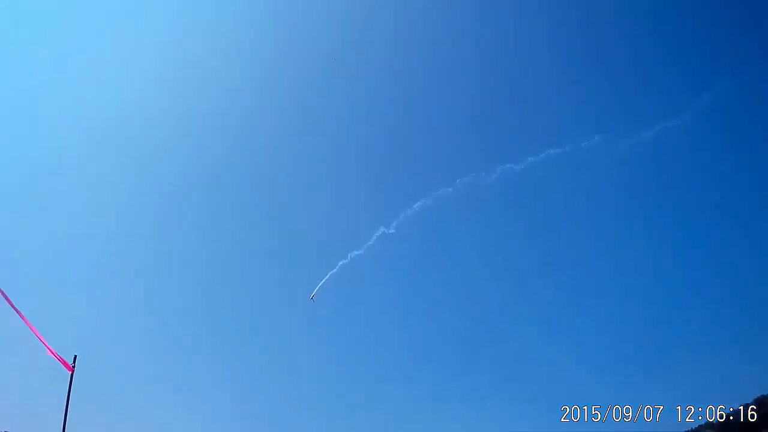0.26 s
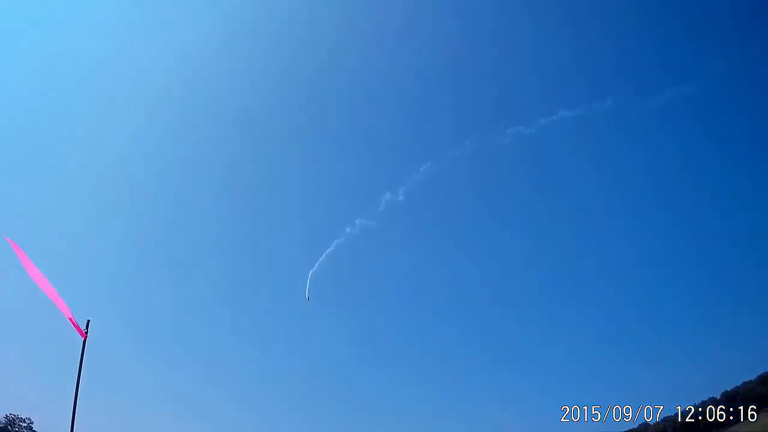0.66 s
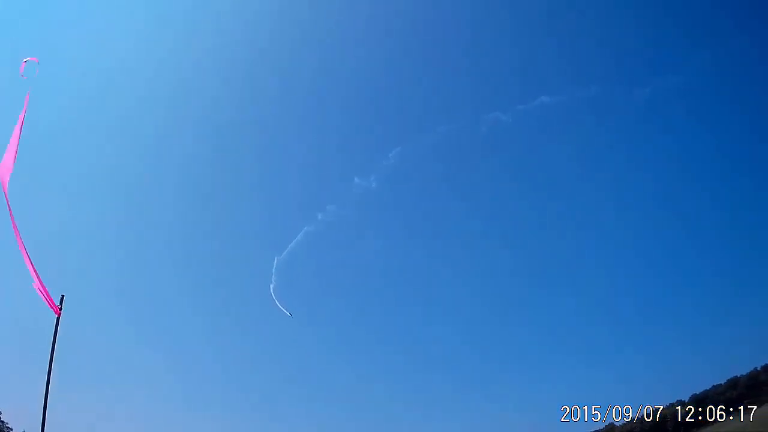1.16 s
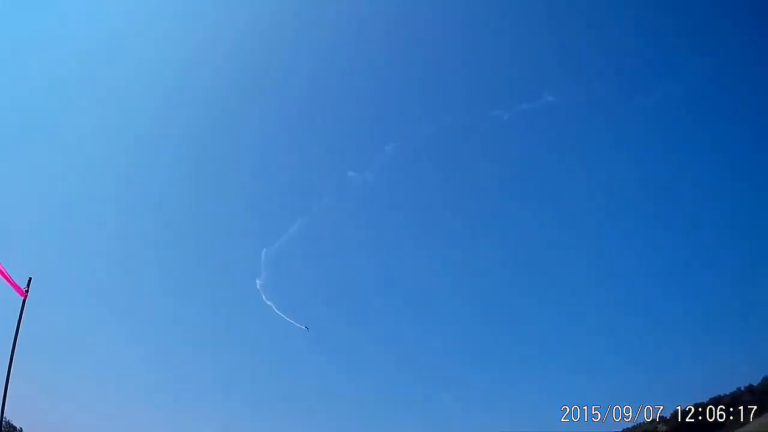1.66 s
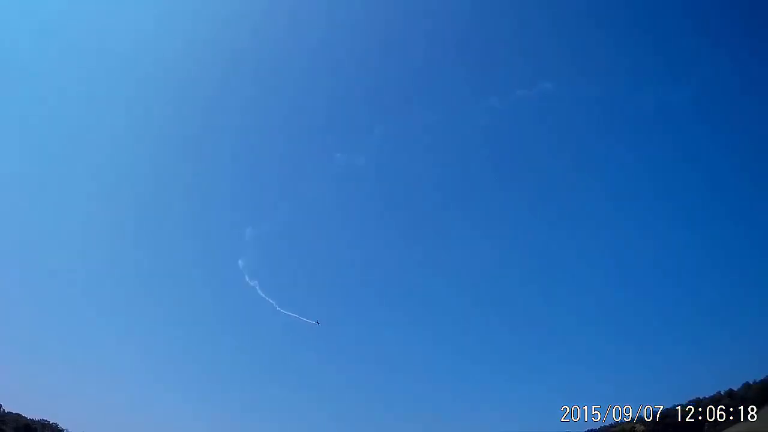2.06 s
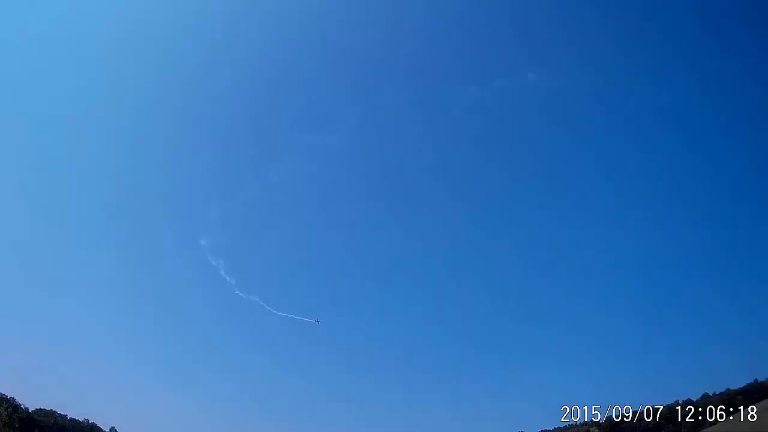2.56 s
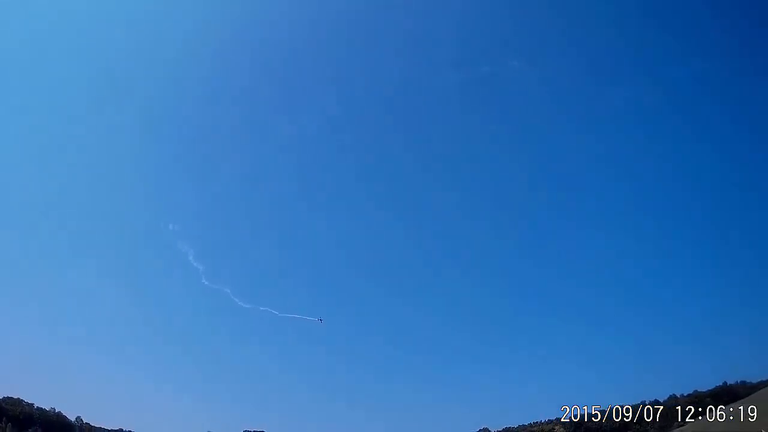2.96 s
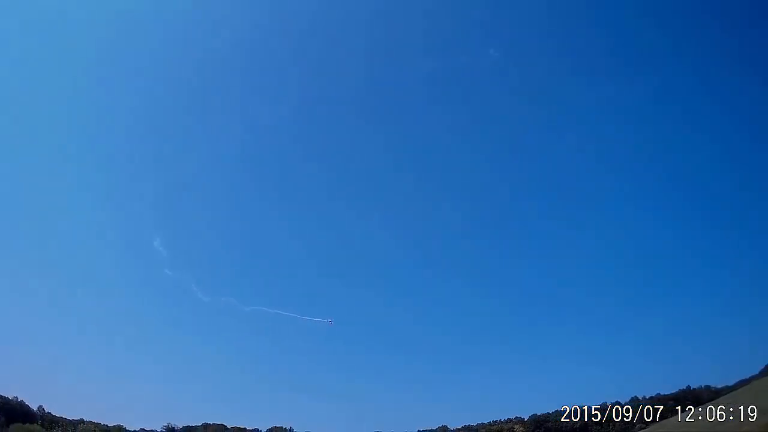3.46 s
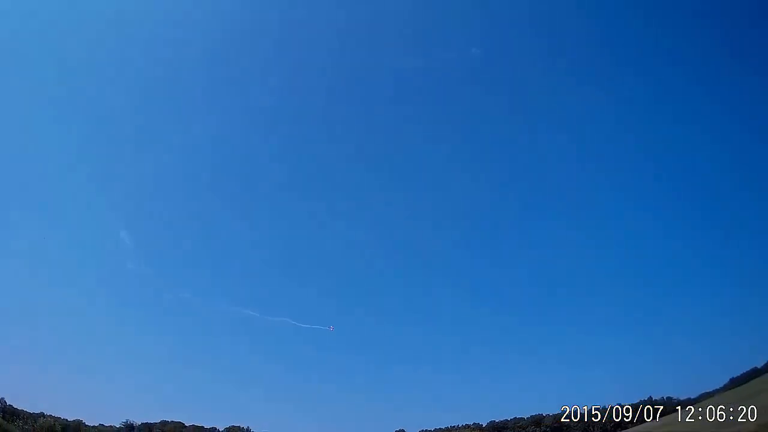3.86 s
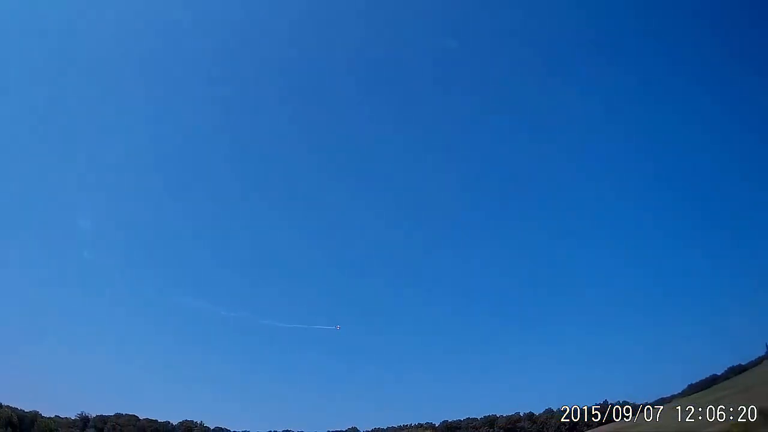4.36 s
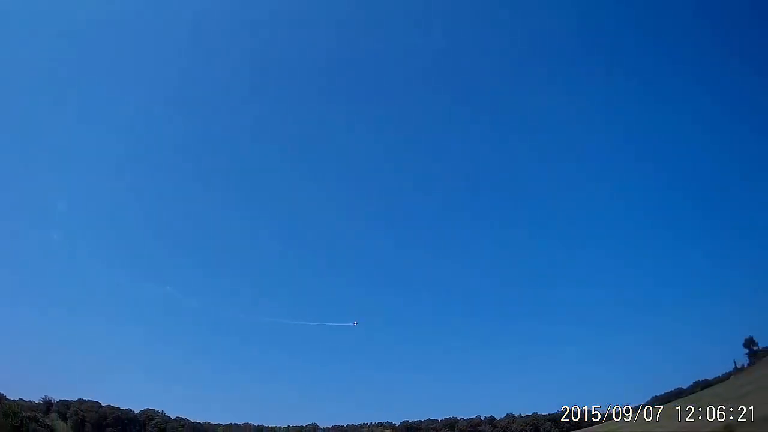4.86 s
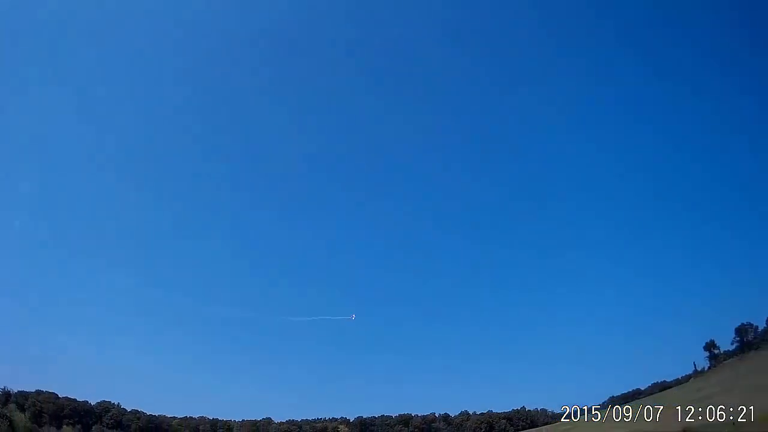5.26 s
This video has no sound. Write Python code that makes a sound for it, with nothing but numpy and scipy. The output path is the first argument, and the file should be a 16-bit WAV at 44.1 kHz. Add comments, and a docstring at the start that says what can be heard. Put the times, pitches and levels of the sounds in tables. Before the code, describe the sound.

A small model plane engine buzzes nasally overhead, loudest in the first half second, then falls away in uneven pulses as its pitch sags and later recovers. Low-frequency wind noise dominates, with soft overloaded thuds and fluttering bursts against the cheap microphone, thickest in the first two seconds. There is thin background hiss, a faint click roughly every second, and two barely audible high chirps from the field just before two seconds.

```python
"""A model aeroplane turns overhead and flies off over a field, heard on a small camera's microphone in gusty wind.
It opens close and side-on: firings crack and ring the silencer, and a three-bladed propeller drones and washes.
The engine sags in the turn, shows its rear quarter and then its tail; it swells and fades, coloured by a ground echo.
Throughout, wind rumbles, flutters and slaps the microphone over unsteady hiss and ticks on a one-second beat.
Two faint chirps come from the field shortly before two seconds; one late tick is missing."""
import sys
import numpy as np
from scipy import signal
from scipy.fft import rfft, irfft
from scipy.io import wavfile
from scipy.ndimage import uniform_filter1d

SR = 44100
rng = np.random.default_rng(int(sys.argv[2]) if len(sys.argv) > 2 else 0)


def master_out(mix):
    """Clip the mix to full scale and print it as 16-bit PCM to the path in sys.argv[1]."""
    frames = np.transpose(np.atleast_2d(mix))
    ceiling = np.clip(frames, -1, 1)
    pcm = np.round(ceiling * 32767).astype(np.int16)
    wavfile.write(sys.argv[1], SR, pcm)


N = 243431
TIME = np.arange(N) / SR  # seconds

# Engine speed as heard, sagging in the turn and picking up on the straight: time_s, firing_rate_hz
ENGINE_SPEED = [(0, 110.4), (.05, 110.3), (.2, 109), (.42, 108.6), (.6, 106.6), (1.1, 103.7), (1.22, 104),
                (1.36, 103.6), (1.78, 103.85), (1.92, 104.7), (2.35, 105.85), (2.52, 106), (2.9, 105.35),
                (3.1, 105.1), (3.18, 105.6), (3.3, 105.05), (3.5, 106.3), (3.7, 105.85), (3.9, 105.9),
                (4.03, 107.55), (4.28, 107.7), (4.55, 110.05), (4.63, 111.5), (4.8, 110.6), (4.94, 108.9),
                (5.04, 109.55), (5.12, 110.7), (5.32, 111.35), (5.52, 110.9)]
# Engine falling back until about four seconds, its buzz then rising again:
# time_s, buzz_level_db, wash_level_db, buzz_tilt_db_per_octave
ENGINE_LEVELS = [(0, -41.5, -48.5, -1), (.48, -42.5, -46.5, -5), (.7, -48.5, -52.5, -2.5),
                 (1.05, -51, -53.5, -3), (1.3, -54.5, -55, -7.5), (2.1, -53, -51.5, -1),
                 (3.1, -58.5, -57.5, -4), (3.9, -59, -57.5, -7), (4.4, -57, -58, -5), (4.95, -57, -61, -6),
                 (5.52, -52.5, -57.5, 0.5)]
# Two low tones fading in and out: time_s, propeller_level_db, exhaust_tone_level_db
DRONE_LEVELS = [(0, -30.5, -47), (.45, -29, -39.5), (.75, -45.5, -49.5), (1.6, -39.5, -49.5),
                (2.25, -33, -66), (2.8, -32, -57.5), (3.3, -26.5, -49), (3.72, -33, -63),
                (4.15, -27.5, -45), (4.7, -37.5, -55), (5.3, -32, -48.5), (5.52, -38, -54.5)]
# Side of the aeroplane facing the microphone: time_s, view (0 side, 1 rear quarter, 2 tail)
VIEW = [(0, 0), (1.05, 0), (1.25, 1), (3.95, 1), (4.5, 2), (5.52, 2)]
# The engine swells and fades, one band most, and the level dips briefly at 4.7 s: peak_s, length_s, band_hz,
# buzz_lift_db, rasp_lift_db
ENGINE_SWELLS = [(.005, 0.21, 1300, 8.5, 4.5), (0.068, 0.067, 2100, -6.5, -10),
                 (0.16, 0.045, 2000, -0.5, 10), (0.195, 0.12, 1410, 8, -3), (0.247, 0.1, 2100, -4, 0),
                 (0.322, 0.14, 1530, 8, 10), (0.48, 0.23, 1200, 5, -2), (0.586, 0.055, 1290, 3.5, 4),
                 (0.802, 0.058, 1300, -2.5, -2), (0.877, 0.2, 2080, 12, 2), (0.912, .09, 1000, 5.5, 7),
                 (1.07, 0.068, 2240, 5.5, 2.5), (1.18, 0.078, 2200, -1.5, -11),
                 (1.604, 0.22, 1830, 10, 1.5), (2.053, 0.17, 1770, 3.5, 6), (2.185, 0.12, 1300, -5.5, -8),
                 (2.317, 0.088, 1960, 7.5, -1), (2.44, 0.11, 2050, -5, -9), (2.497, 0.44, 950, 11, 0),
                 (2.61, 0.098, 2000, 7, 0), (2.72, 0.061, 1500, -3, -2), (3.44, 0.16, 2060, 10.5, 7),
                 (3.84, 0.15, 1670, 15, 6), (4.213, 0.26, 1470, 13.5, 3), (4.385, .06, 2000, -2, 0),
                 (4.51, 0.23, 1520, 13, 0), (4.7, 0.27, 1930, -17.5, -19), (4.81, 0.12, 1570, 14, -5),
                 (4.936, 0.059, 1540, -4, -7), (5.075, 0.072, 2000, -5, -16), (5.182, 0.22, 1410, 10, -3),
                 (5.204, .09, 2050, 5, 9)]
# The rasp turning bright and dull: time_s, tilt_db_per_octave
RASP_BRIGHTNESS = [(0, -4), (.17, 2), (.27, 2), (.34, -2), (.62, -4), (.75, 5), (.88, -18), (1.1, -10),
                   (2, -9), (4.9, -9), (5.2, 1), (5.52, -4)]
# Ground echo, weaker during some swells: time_s, echo_gain (0-1, before each sound's own share)
ECHO_GAIN = [(0, 1), (.35, 0.87), (.7, 1), (.9, 0.7), (1.1, 1), (3.95, 1), (4.2, 0.5), (4.45, 1), (5.52, 1)]

# Engine spectra, only their shape counts: frequency_hz, relative_density_db
SIDE_SPECTRUM = [(450, -16), (650, 9.5), (760, -2), (870, 6.5), (1080, 11), (1200, 14), (1310, 13),
                 (1420, 14), (1530, 17.5), (1640, 14.5), (1750, -1.5), (1880, 16), (2100, 14.5), (2300, 8),
                 (2450, 2.5), (2650, -19), (3400, -45)]
QUARTER_SPECTRUM = [(450, -17), (640, 9), (740, -4), (840, 7), (945, 9), (1050, 13), (1155, 7), (1260, 12),
                    (1365, 17), (1470, 16), (1575, 0.5), (1680, 17.5), (1785, 16.5), (1890, 14.5),
                    (2110, 15.5), (2210, 12.5), (2320, 3), (2620, -19), (3400, -34)]
TAIL_SPECTRUM = [(450, -11.5), (640, 10), (760, -10), (860, -6), (1000, 9.5), (1100, 8), (1215, 14.5),
                 (1320, 13.5), (1420, 3.5), (1545, 18), (1660, 8), (1880, 10.5), (2100, 16), (2320, 1),
                 (2600, -19), (3400, -52)]
RASP_SPECTRUM = [(1200, -25), (2200, -10), (2700, -19), (3050, -4), (3380, -1.5), (3480, 2.5), (3600, -1.5),
                 (3900, -5), (4350, -2), (4750, -10), (5200, -18), (8000, -28), (12000, -45)]
WASH_SPECTRUM = [(400, -13), (750, -7), (1100, -3), (1500, 5), (1900, -0.5), (2200, -17), (2600, -16.5),
                 (3500, -17), (6000, -45)]

# Strength of the wind before gusts and buffets: time_s, rumble_level_db, flutter_level_db
WIND_LEVELS = [(0, -23, -24.5), (.35, -20.5, -28), (.52, -18, -27), (1.1, -19.5, -25), (1.55, -22, -28.5),
               (2.08, -17.5, -25.5), (2.25, -25, -35), (2.85, -24, -31.5), (3.2, -18.5, -26.5),
               (3.5, -25, -32.5), (3.77, -23, -34.5), (3.92, -19, -31), (4.7, -21, -32), (4.8, -23, -37),
               (5.38, -25, -42), (5.52, -38, -48)]
# Gusts that stand out: peak_s, length_s, rumble_lift_db, flutter_lift_db
WIND_GUSTS = [(0.003, 0.055, 5, 2.5), (0.135, 0.1, 8, 4), (0.453, 0.093, 3, 10.5), (0.58, 0.077, 3, 9.5),
              (0.691, 0.037, 7, 2), (0.762, 0.03, -12, 10.5), (0.834, 0.03, -8.5, -2),
              (0.946, 0.14, 4, 5.5), (1.138, 0.099, -0.5, 4.5), (1.21, 0.034, 2, 2), (1.317, 0.11, 4, 5),
              (1.484, 0.061, 5, 6.5), (1.672, 0.084, 4.5, 8.5), (1.777, 0.037, -1, -11),
              (1.927, 0.033, -13, 3), (2.094, 0.042, -7, 5.5), (2.273, 0.13, 1.5, 5),
              (2.445, 0.023, -1, 12.5), (2.563, 0.12, 5.5, 4.5), (2.88, 0.066, -3, -10),
              (2.957, 0.023, 1, 6), (3.205, 0.066, 0, 1), (3.377, 0.045, 5, -3.5), (3.625, 0.069, 9.5, 8),
              (3.766, 0.065, -3, -1), (3.91, 0.028, 3.5, 1.5), (4.05, 0.08, 3.5, 3), (4.163, 0.02, -13, -8),
              (4.225, 0.089, 2, 3.5), (4.295, 0.078, 2.5, 6), (4.395, .04, 1, -4), (4.52, 0.1, 4.5, 6.5),
              (4.573, 0.017, 9.5, -4), (4.634, 0.07, 7.5, 11), (4.673, 0.033, 7, -5), (4.96, 0.05, 2, -16),
              (5.029, 0.039, -10, -11), (5.148, 0.03, 6, 9.5)]
# Single eddies slapping the microphone, before its port and overload: centre_s, peak_db, pitch_hz
MIC_SLAPS = [(.122, -11, 150), (.181, -10, 135), (.471, -8.5, 215), (.572, -10, 140), (.597, -9, 215),
             (.621, -10, 135), (.684, -6, 170), (.738, -9, 160), (.765, -11, 150), (.959, -8, 145),
             (.981, -6.5, 210), (1.044, -7.5, 170), (1.102, -8.5, 175), (1.143, -3.5, 145),
             (1.48, -8.5, 195), (1.654, -9.5, 225), (1.686, -9, 170), (2.071, -11, 145), (3.148, -10, 185),
             (3.217, -5.5, 230), (3.647, -2.5, 240), (3.862, -10, 205), (4.058, -11, 160),
             (4.125, -10.5, 200), (4.211, -9.5, 185), (4.318, -11, 195), (4.443, -8, 155), (4.515, -7, 195),
             (4.701, -8.5, 185), (4.735, -12, 200)]
# Wind spectra for large and small eddies, only their shape counts: frequency_hz, relative_density_db
RUMBLE_SPECTRUM = [(10, -47), (22, -7), (45, 2.5), (80, 3.5), (125, 1), (180, -5.5), (240, -13),
                   (320, -26.5), (500, -36.5), (900, -61)]
FLUTTER_SPECTRUM = [(60, -28.5), (150, 1.5), (230, -1), (300, -4.5), (380, -10.5), (470, -19), (580, -29.5),
                    (750, -47.5), (1200, -44)]

# Faint whistles from the field: start_s, length_s, pitch_hz, peak_db
FIELD_CHIRPS = [(1.785, .09, 8330, -62), (1.935, .035, 8400, -72)]
# Camera hiss, only its shape counts: frequency_hz, relative_density_db
HISS_SPECTRUM = [(300, 9), (2000, 4), (3000, -4.5), (4400, -3.5), (5200, -6.5), (7500, -8.5), (8300, -7),
                 (9000, -9), (12600, -10.5), (14000, -13), (15300, -36)]
# Camera hiss before its small random waver: time_s, level_db
HISS_LEVELS = [(0, -51.5), (.23, -55), (.4, -48.5), (.72, -54), (.92, -53.5), (1.18, -57.5), (1.55, -51.5),
               (2.07, -50), (2.5, -53.5), (3.17, -49.5), (3.82, -51), (4.3, -54), (4.51, -50.5),
               (4.71, -55.5), (4.97, -51), (5.1, -56.5), (5.32, -50.5), (5.52, -55)]
# Electrical ticks before the camera's top cut: start_s, peak_db
CAMERA_TICKS = [(0.2866, -23), (1.2866, -21), (2.2878, -36), (3.287, -25.5), (5.2868, -25.5)]

# Rasp level at the usual buzz level, and its dB per dB of buzz
RASP_DB, RASP_FOLLOW, USUAL_BUZZ_DB = -62.5, 0.97, -49.5
BUZZ_ECHO, RASP_ECHO = 0.6, 0.35  # echo share of each; grass scatters the treble
FOCUS_WIDTH_HZ, SWELL_SPREAD = 290, 0.43  # width of a swell's band; share of the lift the other bands get
WASH_SHARE = 0.2  # share of an upward lift that the wash gets
# Echo delay high up and at the horizon; the aeroplane sinks fast at first
HIGH_LAG_S, LOW_LAG_S, DESCENT_S, DESCENT_EASE = 0.00574, 0.00313, 5.9, 2.7
# Small random buffets: changes per second, then the signed spread for each layer
BUFFET_RATE, RUMBLE_BUFFET_DB, FLUTTER_BUFFET_DB = 28, 1, -1
MIC_DRIVE = 0.79  # how hard the wind pushes the microphone into overload
TOP_HZ = 15600  # the camera's upper limit


def aeroplane():
    """Exhaust pulses and propeller tone locked to one shaft, over the propeller's wash."""
    firing_hz, = curves(ENGINE_SPEED)
    buzz_db, wash_db, tilt_db = curves(ENGINE_LEVELS)
    swells, rasp_lift_db = [], 0
    for peak_s, length_s, band_hz, buzz_lift_db, lift_db in ENGINE_SWELLS:
        shape = hump(peak_s, length_s)
        swells.append((band_hz, buzz_lift_db * shape))
        rasp_lift_db = rasp_lift_db + lift_db * shape
    rasp_db = RASP_DB + RASP_FOLLOW * (buzz_db - USUAL_BUZZ_DB) + rasp_lift_db

    turns = np.cumsum(firing_hz * (1 + 0.0005 * walk(25))) / SR  # one firing a turn
    pulses = firings(turns, scatter_db=0.45, jitter_s=0.000005)
    exhaust = over_ground(buzz(pulses, tilt_db, swells) * undb(buzz_db), BUZZ_ECHO)
    exhaust += over_ground(rasp(turns) * undb(rasp_db), RASP_ECHO)
    return exhaust + drone(turns) + wash(wash_db, swells)


def firings(turns, scatter_db, jitter_s):
    """One pressure pulse a shaft turn, each a little different in size and moment."""
    at = np.interp(np.arange(int(turns[-1]) + 1), turns, np.arange(N))
    timing, strength = rng.standard_normal((2, len(at)))
    at = np.clip(at + jitter_s * SR * timing, 0, N - 2)
    first, size = at.astype(int), undb(scatter_db * strength)
    # share each pulse between two samples to keep its exact moment
    late = at % 1
    return np.bincount(first, size * (1 - late), N) + np.bincount(first + 1, size * late, N)


def buzz(pulses, tilt_db, swells):
    """Firings ring the silencer; its colour changes as the tail swings round, and swells favour their bands."""
    def shape_db(hz):
        """Spectral tilt plus the lift of every swell at this frequency."""
        level_db = tilt_db * np.log2(hz / 1500)
        for band_hz, lift_db in swells:
            focus = np.exp(-((hz - band_hz) / FOCUS_WIDTH_HZ) ** 2)
            level_db = level_db + lift_db * (SWELL_SPREAD + (1 - SWELL_SPREAD) * focus)
        return level_db

    view, = curves(VIEW)
    ring = np.zeros(N)
    for k, spectrum in enumerate((SIDE_SPECTRUM, QUARTER_SPECTRUM, TAIL_SPECTRUM)):
        ring += np.maximum(1 - np.abs(view - k), 0) * colour(pulses, spectrum)
    return fade(ring, np.linspace(850, 2250, 8), shape_db, waver_db=1.2, rate=9)


def rasp(turns):
    """Each firing cracks unevenly and gas hisses out behind it; the treble turns bright and dull."""
    pulses = firings(turns, scatter_db=2.2, jitter_s=0.00002)
    gas = unit(np.exp(-(turns % 1) / 0.12) * rng.standard_normal(N))
    crack = colour(unit(pulses) + 0.12 * gas, RASP_SPECTRUM)
    tilt_db, = curves(RASP_BRIGHTNESS)

    def shape_db(hz):
        """Treble tilt about 3700 Hz."""
        return tilt_db * np.log2(hz / 3700)

    return fade(crack, [2900, 3400, 3900, 4400, 6000], shape_db, waver_db=2.4, rate=24)


def drone(turns):
    """Three blades sound the third shaft order; the exhaust adds a low tone on the fifth."""
    blade_db, pipe_db = curves(DRONE_LEVELS)
    blades = np.sin(2 * np.pi * 3 * turns) * undb(blade_db + 1.5 * walk(16))
    pipe = np.sin(2 * np.pi * 5 * turns) * undb(pipe_db)
    return blades + pipe


def wash(wash_db, swells):
    """Propeller turbulence as coloured noise, taking a little of each net swell and all of each net fade."""
    lift_db = sum(db for _, db in swells)
    return noise(WASH_SPECTRUM) * undb(wash_db + np.minimum(WASH_SHARE * lift_db, lift_db))


def over_ground(x, share):
    """Direct sound plus its echo off the field: a comb that slides through the harmonics."""
    height = np.maximum(1 - TIME / DESCENT_S, 0) ** DESCENT_EASE
    lag_s = LOW_LAG_S + (HIGH_LAG_S - LOW_LAG_S) * height
    gain = share * curves(ECHO_GAIN)[0]
    echo = np.interp(TIME - lag_s, TIME, x)
    return (x + gain * echo) / np.sqrt(1 + gain ** 2)


def fade(x, centres_hz, shape_db, waver_db, rate):
    """Neighbouring bands follow shape_db(hz) and also wax and wane on their own."""
    spectrum, grid_hz = rfft(x), np.fft.rfftfreq(N, 1 / SR)
    out = np.zeros(N)
    for hz, weights in zip(centres_hz, np.eye(len(centres_hz))):
        band = irfft(spectrum * np.interp(grid_hz, centres_hz, weights), N)
        out += band * undb(shape_db(hz) + waver_db * walk(rate))
    return out


def wind():
    """Large eddies rumble, small ones flutter in bursts, gusts shift both, and a few eddies slap the microphone."""
    rumble_db, flutter_db = curves(WIND_LEVELS)
    buffet = walk(BUFFET_RATE)
    rumble_db = rumble_db + RUMBLE_BUFFET_DB * buffet
    flutter_db = flutter_db + FLUTTER_BUFFET_DB * buffet
    for peak_s, length_s, rumble_lift_db, flutter_lift_db in WIND_GUSTS:
        gust = hump(peak_s, length_s)
        rumble_db = rumble_db + rumble_lift_db * gust
        flutter_db = flutter_db + flutter_lift_db * gust
    out = evened(noise(RUMBLE_SPECTRUM)) * undb(rumble_db)
    out += evened(noise(FLUTTER_SPECTRUM)) * undb(flutter_db + 2.6 * walk(55))
    out += slaps()
    # eddies smaller than the microphone port average out
    return signal.sosfiltfilt(signal.butter(2, 1000, fs=SR, output="sos"), out)


def slaps():
    """Passing vortices: each a suction dip between two pressure humps."""
    out = np.zeros(N)
    for centre_s, peak_db, hz in MIC_SLAPS:
        reach = (np.pi * hz * (TIME - centre_s)) ** 2
        out -= undb(peak_db) * (1 - 2 * reach) * np.exp(-reach)
    return out


def chirps():
    """Thin, slightly unsteady sine whistles from the field."""
    out, waver = np.zeros(N), 1 + 0.0037 * walk(70)
    for start_s, length_s, hz, peak_db in FIELD_CHIRPS:
        progress = np.clip((TIME - start_s) / length_s, 0, 1)
        swell = np.sqrt(np.abs(np.sin(np.pi * progress)))
        out += undb(peak_db) * swell * np.sin(2 * np.pi * np.cumsum(hz * waver) / SR)
    return out


def camera():
    """Coloured-noise hiss that swells and dips, and one-sample electrical ticks."""
    hiss_db, = curves(HISS_LEVELS)
    out = noise(HISS_SPECTRUM) * undb(hiss_db + 0.7 * walk(12))
    for start_s, peak_db in CAMERA_TICKS:
        out[int(start_s * SR)] += undb(peak_db)
    return out


def undb(db):
    """Decibels to gain."""
    return 10 ** (np.asarray(db) / 20)


def curves(table):
    """The columns of a timed table, one value a sample."""
    time_s, *columns = np.transpose(table)
    return [np.interp(TIME, time_s, column) for column in columns]


def hump(peak_s, length_s):
    """A smooth rise to 1 and fall, about length_s long at half height."""
    return np.exp(-np.pi * np.minimum(((TIME - peak_s) / length_s) ** 2, 10))


def unit(x):
    """Scale to rms 1."""
    return x / np.sqrt(np.mean(x ** 2))


def evened(x):
    """Partly even out the slow level changes of a noise."""
    return x / uniform_filter1d(x ** 2, SR // 12) ** 0.4


def walk(rate):
    """Random levels held 1 / rate seconds and smoothed twice; rms 1."""
    hold = int(SR / rate)
    steps = np.repeat(rng.standard_normal(N // hold + 1), hold)[:N]
    return unit(uniform_filter1d(uniform_filter1d(steps, hold), hold))


def colour(x, points, size=8192):
    """Causal minimum-phase filter with the given spectrum; output at rms 1."""
    hz, db = np.transpose(points)
    grid_hz = np.maximum(np.fft.rfftfreq(size, 1 / SR), 1)
    gain = undb(np.interp(np.log(grid_hz), np.log(hz), db))
    # folding the cepstrum onto positive time makes the filter causal
    cepstrum = irfft(np.log(gain))
    cepstrum[1:size // 2] *= 2
    cepstrum[size // 2 + 1:] = 0
    response = irfft(np.exp(rfft(cepstrum)))
    return unit(signal.fftconvolve(x, response)[:N])


def noise(points):
    """Coloured noise at rms 1."""
    return colour(rng.standard_normal(N), points)


def scene():
    """Aeroplane, wind, chirps and camera noise on one microphone."""
    return (aeroplane() + wind() + chirps() + camera())[None]


def record(dry):
    """The microphone rounds off the hardest slaps; the camera cuts the top."""
    rounded = np.tanh(MIC_DRIVE * dry) / MIC_DRIVE
    top_cut = signal.ellip(8, 0.2, 70, TOP_HZ, fs=SR, output="sos")
    return signal.sosfilt(top_cut, rounded)


dry = scene()
out = record(dry)
master_out(out)
```